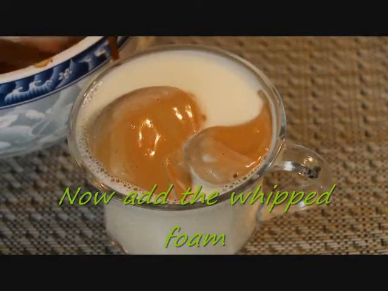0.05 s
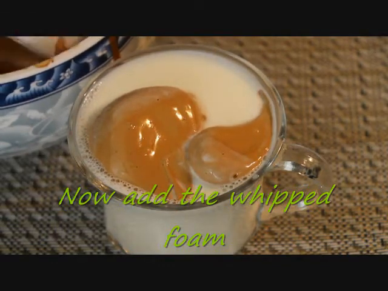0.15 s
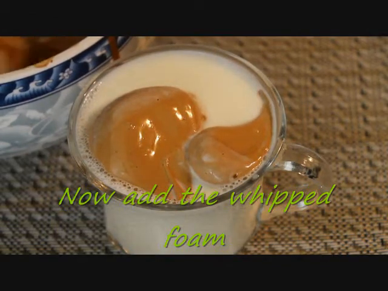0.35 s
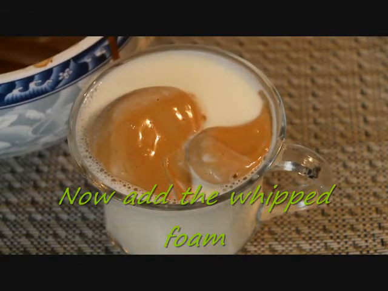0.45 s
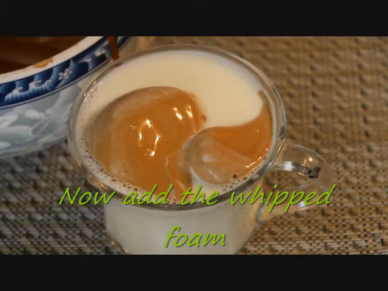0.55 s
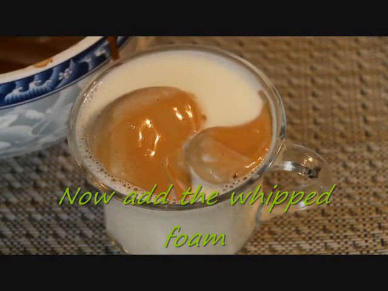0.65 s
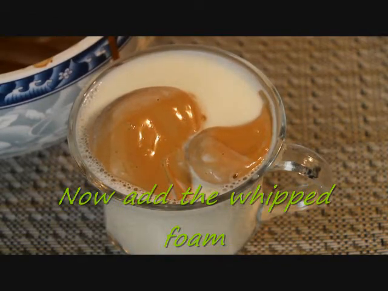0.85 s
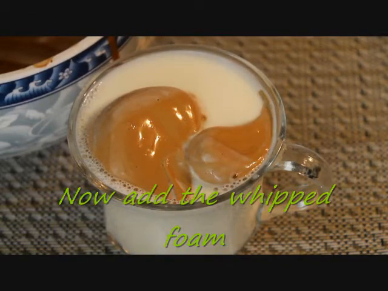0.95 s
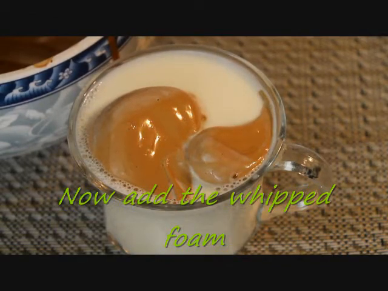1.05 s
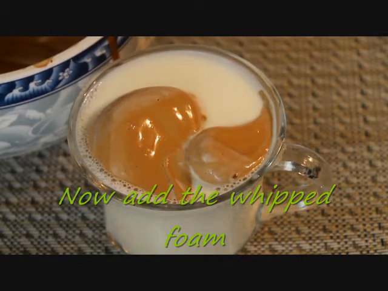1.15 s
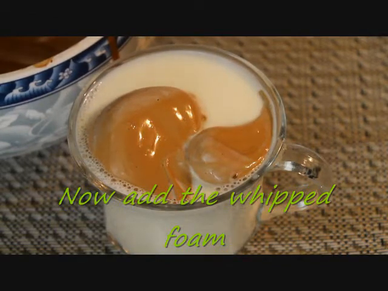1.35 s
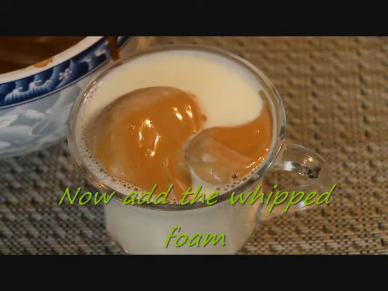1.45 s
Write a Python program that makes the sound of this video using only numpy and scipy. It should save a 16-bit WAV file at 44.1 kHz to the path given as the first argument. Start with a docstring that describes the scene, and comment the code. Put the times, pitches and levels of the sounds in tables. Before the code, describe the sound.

One sharp clink on a china bowl, then tiny handling ticks over soft appliance hum.

```python
"""A quiet kitchen, with an appliance humming steadily over soft room tone.
Some tableware is still ringing faintly at the start. A utensil knocks once against a china dish:
a hard double contact, a short ring with faint lingering room resonances, and a soft table thud.
A few tiny ticks and soft scuffs of handling follow. The room adds a short tail to knock and ticks."""
import sys
import numpy as np
from scipy import signal
from scipy.io import wavfile
from scipy.ndimage import uniform_filter1d

SR = 44100
rng = np.random.default_rng(int(sys.argv[2]) if len(sys.argv) > 2 else 0)


def dump(signal):
    """Clip the signal to [-1, 1] and save it as 16-bit WAV at the path in sys.argv[1]."""
    limited = np.clip(np.atleast_2d(signal).T, -1, 1)
    pcm = np.round(limited * 32767).astype(np.int16)
    wavfile.write(sys.argv[1], SR, pcm)


N = 66150

# room tone EQ: freq_hz, gain_db
ROOM_TONE_EQ = [(20, -30), (40, -21), (58, -18), (78, -9.5), (105, -15.5), (160, -14), (240, 1.5),
                (310, -5.5), (420, 0), (620, -8.5), (850, -8), (1150, -11), (1600, -16), (3000, -22),
                (6000, -25.5), (9000, -30), (11000, -34), (16000, -32.5)]
# appliance tones: pitch_hz, rms_db, waver_ratio
HUM_TONES = [(59.2, -73, 0.43), (99.5, -72, 0.11), (147.8, -71, 0.33), (198.7, -59.5, 0.12),
             (248.7, -58, 0.22), (302.7, -65.5, 0.23), (401.2, -62.5, 0.81), (491, -64, 1), (765, -67, 1),
             (1005, -60.5, 0.098)]
# kitchen reverb by band: freq_hz, gain_db, t60_s
REVERB_BANDS = [(120, 13, 0.6), (450, 9, 0.4), (800, 1, 0.45), (1350, -4.5, 0.57), (1800, 0, 0.43),
                (2350, -4, 0.61), (2720, -1.5, 0.41), (3670, -6, 0.45), (4840, -14, 0.48),
                (7000, -12.5, 0.39), (11000, -14, 0.48), (16000, -21, 0.28)]
# tableware dying away at the start: pitch_hz, level_db, t60_s
TABLEWARE_MODES = [(1026, -57, 0.56), (2653, -53.5, 0.54), (4673, -61.5, 0.25)]
# soft scuffs of handling: centre_s, width_s, level_db
SCUFF_SWELLS = [(.533, 0.012, -49), (1.138, 0.011, -58.5)]
# scuff EQ: freq_hz, gain_db
SCUFF_EQ = [(300, -18.5), (1000, 3.5), (1400, -2), (1800, 3), (2300, -4.5), (3000, -11), (6000, -14.5),
            (10000, -29), (16000, -31)]
# faint crackly rustles: centre_s, width_s, level_db
RUSTLE_SWELLS = [(.378, 0.005, -63), (.515, 0.0042, -64), (1.138, 0.016, -62), (1.245, 0.024, -62.5)]
# rustle EQ: freq_hz, gain_db
RUSTLE_EQ = [(500, -18), (3000, -4), (7000, 3), (12000, -4.5), (16000, -10)]
# tiny ticks: start_s, gain_db, tilt_db_per_octave
TICK_CUES = [(.4084, -12.5, -3), (.4195, -10.5, -10), (.5105, -13.5, 5), (.5397, -5, -3.5), (.8547, 2, 0.5),
             (.8556, -5.5, 1), (.8944, 3, 2), (.9600, -4.5, 8), (1.2115, -9.5, 0.5), (1.2765, -15, 8),
             (1.4885, -17.5, 2)]
# tick EQ: freq_hz, gain_db
TICK_EQ = [(500, -33), (2500, -26.5), (5000, -23), (8000, -17), (11000, -22), (16000, -30)]
# the utensil lands and catches again at once: start_s, gain_db
KNOCK_CONTACTS = [(0.2075, 2.5), (0.2083, 2)]
# EQ of each contact's crack: freq_hz, gain_db
CRACK_EQ = [(150, -34), (500, -16.5), (1100, 8.5), (2000, 6), (3400, 4.5), (4800, 7.5), (7000, 0.5),
            (8500, -5.5), (12700, -13.5), (13800, -29), (16000, -26)]
# ring of the china dish, with faint lingering room resonances: pitch_hz, level_db, t60_s
DISH_AND_ROOM_MODES = [(824.7, -23.5, 0.095), (1033, -30, 0.34), (1146, -7.5, 0.015), (1628, -39.5, 0.49),
                       (1795, -12, .052), (1934, -11.5, 0.042), (1998, -37, 0.48), (2264, -26.5, 0.038),
                       (2686, -17, 0.044), (3050, -17.5, 0.015), (3700, -23, .009), (4320, -21, 0.015),
                       (5000, -20, .004), (7340, -31, .015)]
# thud of the table under the dish: pitch_hz, level_db, t60_s
TABLE_MODES = [(99, -53, 0.18), (135.4, -42.5, 0.22), (225.5, -40.5, .14)]


def amp(db):
    """Decibels to gain."""
    return 10 ** (np.asarray(db) / 20)


def unit(x):
    """Scales to rms 1."""
    return x / np.sqrt(np.mean(abs(x) ** 2) + 1e-20)


def curve(table, hz, column=1):
    """Reads one column of a table along log frequency."""
    table = np.array(table, float)
    return np.interp(np.log(hz + 1), np.log(table[:, 0] + 1), table[:, column])


def place(start_s, sound):
    """Drops a sound on an empty track at its start time."""
    return np.concatenate([np.zeros(round(start_s * SR)), sound, np.zeros(N)])[:N]


def swells(cues):
    """A fader curve of smooth bumps."""
    t = np.arange(N) / SR
    return sum(amp(db) * np.exp(-.5 * ((t - centre) / width) ** 2) for centre, width, db in cues)


def click(eq, tilt_db_per_octave=0, pivot_hz=7100):
    """An impulse shaped by an EQ and a treble tilt; minimum phase keeps the attack sharp."""
    hz = abs(np.fft.fftfreq(2048, 1 / SR))
    octaves = np.log2(np.maximum(hz / pivot_hz, .25))
    log_gain = np.log(amp(curve(eq, hz) + tilt_db_per_octave * octaves))
    return np.fft.ifft(np.exp(np.conj(signal.hilbert(log_gain)))).real


def ring(modes, rise_s=.001):
    """Resonances: decaying sines with a short fade-in."""
    t = np.arange(N) / SR
    partials = sum(amp(db - 60 * t / t60) * np.sin(2 * np.pi * hz * t) for hz, db, t60 in modes)
    return np.minimum(t / rise_s, 1) * partials


def noise(eq, drift_db=0):
    """Coloured noise of rms 1; patches of its spectrum drift in level by about drift_db."""
    frames = dict(nperseg=2048, noverlap=1536)
    hz, _, spectrum = signal.stft(rng.standard_normal(N), SR, **frames)
    patches = uniform_filter1d(rng.standard_normal(spectrum.shape), size=14, axis=0)
    patches = unit(uniform_filter1d(patches, size=7, axis=1))
    spectrum *= amp(curve(eq, hz)[:, None] + drift_db * patches)
    return unit(signal.istft(spectrum, SR, **frames)[1][:N])


def room_tone(rms_db=-51.5):
    """A steady bed of soft, dark noise."""
    return amp(rms_db) * noise(ROOM_TONE_EQ, drift_db=1.57)


def appliance_hum(waver_hz=6.6):
    """Steady pitches, each wavering in level on its own."""
    t = np.arange(N) / SR
    lowpass = np.exp(-.5 * (np.fft.fftfreq(N, 1 / SR) / waver_hz) ** 2)
    hum = np.zeros(N)
    for hz, db, waver in HUM_TONES:
        drift = unit(np.fft.ifft(lowpass * np.exp(2j * np.pi * rng.random(N))))  # moves level and phase
        tone = np.exp(2j * np.pi * (hz * t + rng.random()))
        hum += amp(db) * unit(((1 + waver * drift) * tone).real)
    return hum


def kitchen_reverb(x, scatter_db=-9, scatter_t60_s=.073, scatter_delay_s=.0012, tail_delay_s=.003):
    """Wet only: quick scatter off the table top and crockery, then a diffuse tail."""
    hz, t, spectrum = signal.stft(rng.standard_normal(SR), SR, nperseg=256)
    t60 = curve(REVERB_BANDS, hz, column=2)[:, None]
    spectrum *= amp(curve(REVERB_BANDS, hz)[:, None] - 60 * t / t60)
    spectrum *= np.sqrt(2 * np.log(1000) / (t60 * SR))  # a longer decay adds no energy
    tail = signal.istft(spectrum, nperseg=256)[1]
    scatter = rng.standard_normal(N) * amp(-60 * np.arange(N) / SR / scatter_t60_s)
    scatter *= amp(scatter_db) / np.linalg.norm(scatter)
    response = place(tail_delay_s, tail) + place(scatter_delay_s, scatter)
    return signal.fftconvolve(x, response)[:N]


def lingering_tableware():
    """Faint modes already ringing as the scene opens."""
    return ring(TABLEWARE_MODES)


def handling(grains_per_s=1000, spread_db=7):
    """Brief swells of rubbing noise and of fine crackle."""
    grains = (rng.random(N) < grains_per_s / SR) * rng.choice([-1, 1], N)
    grains = grains * amp(spread_db * rng.standard_normal(N))
    crackle = unit(signal.fftconvolve(grains, click(RUSTLE_EQ))[:N])
    return noise(SCUFF_EQ) * swells(SCUFF_SWELLS) + crackle * swells(RUSTLE_SWELLS)


def ticks(send_db=-1.5):
    """Tiny, bright clicks with a touch of room."""
    direct = sum(place(start_s, amp(db) * click(TICK_EQ, tilt)) for start_s, db, tilt in TICK_CUES)
    return direct + amp(send_db) * kitchen_reverb(direct)


def utensil_knock(ring_delay_s=.00023, ring_send_db=-8.5):
    """Two hard contacts ring the dish briefly and nudge the table; faint room resonances linger."""
    hit_s = KNOCK_CONTACTS[0][0]
    contacts = [place(start_s, amp(db) * click(CRACK_EQ)) for start_s, db in KNOCK_CONTACTS]
    cracks = sum(crack + kitchen_reverb(crack) for crack in contacts)  # each gets its own reflections
    ringing = place(hit_s + ring_delay_s, ring(DISH_AND_ROOM_MODES))
    thud = place(hit_s, ring(TABLE_MODES, rise_s=.017))
    return cracks + ringing + amp(ring_send_db) * kitchen_reverb(ringing) + thud


def scene():
    """The mono mix."""
    foreground = utensil_knock() + ticks() + handling()
    return (foreground + lingering_tableware() + room_tone() + appliance_hum())[None]


def record(dry, cutoff_hz=15900):
    """A steep low-pass trims the very top."""
    lowpass = signal.firwin(511, cutoff_hz, window=("kaiser", 9), fs=SR)
    return signal.oaconvolve(dry, lowpass[None], "same")


dry = scene()
out = record(dry)
dump(out)
```